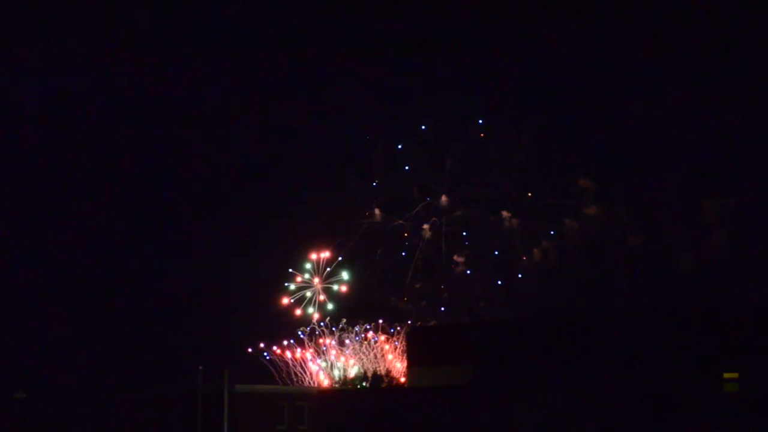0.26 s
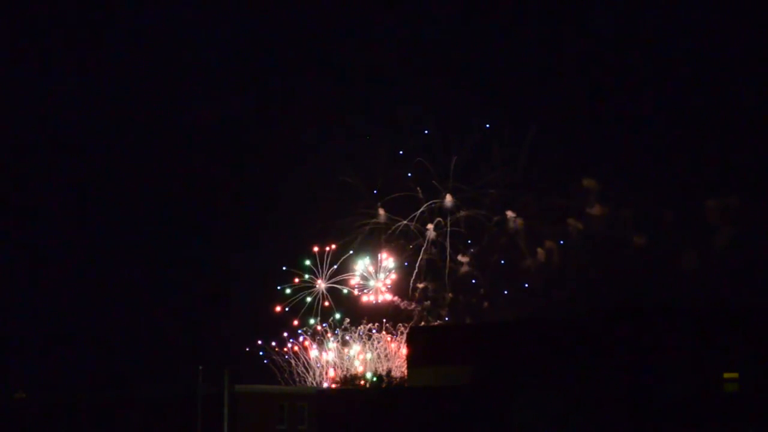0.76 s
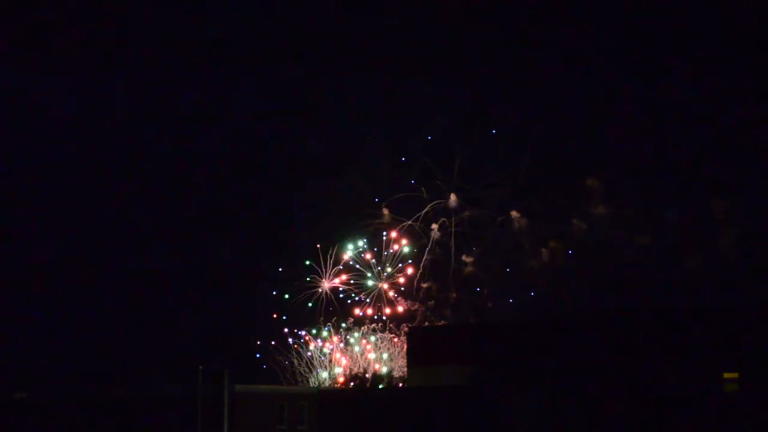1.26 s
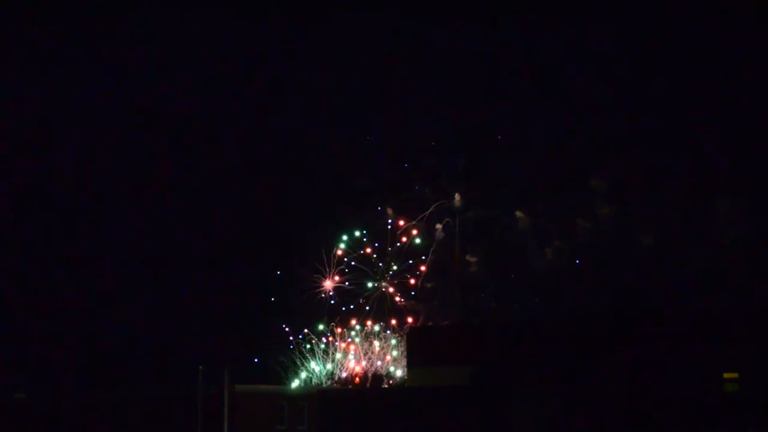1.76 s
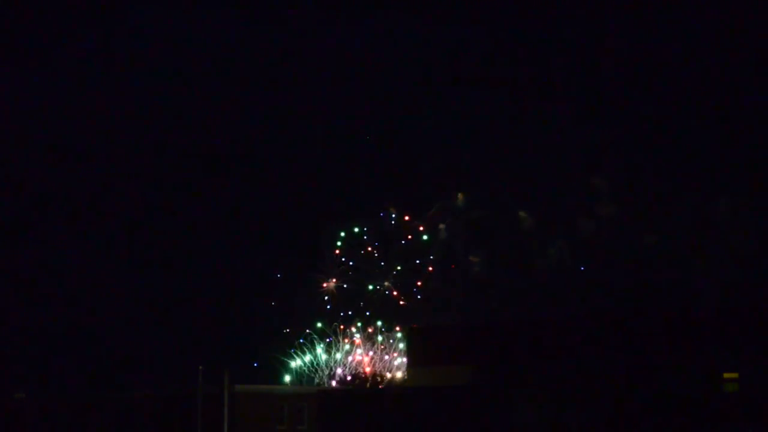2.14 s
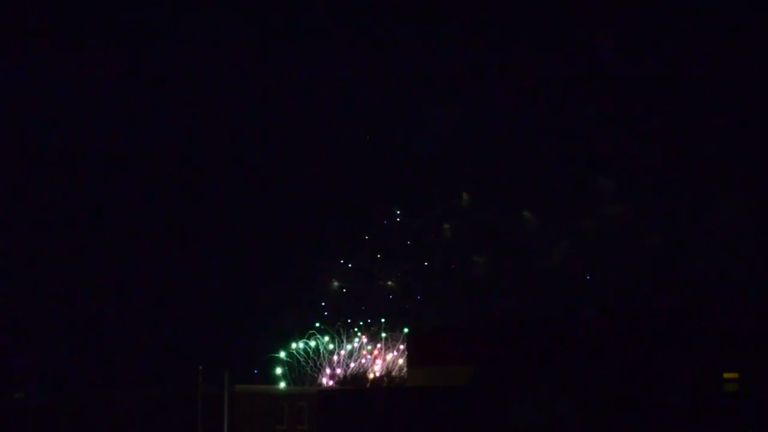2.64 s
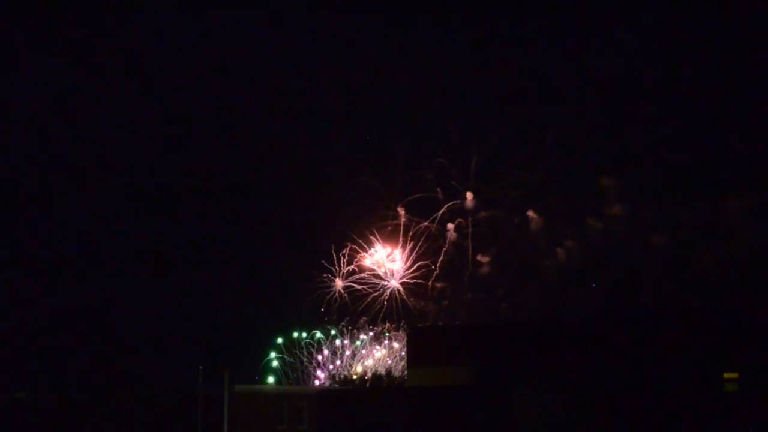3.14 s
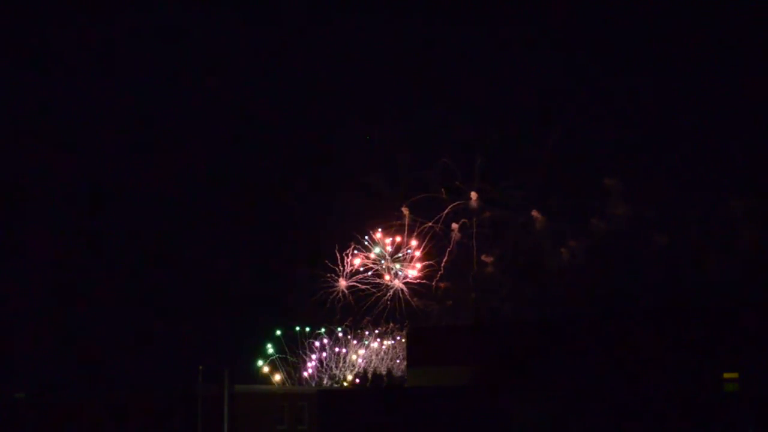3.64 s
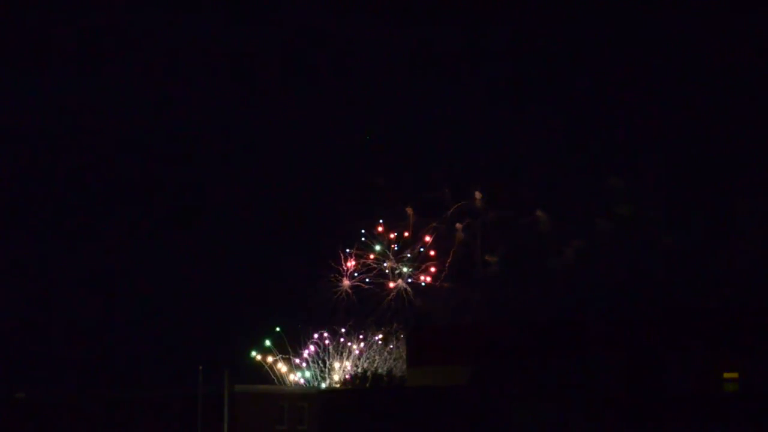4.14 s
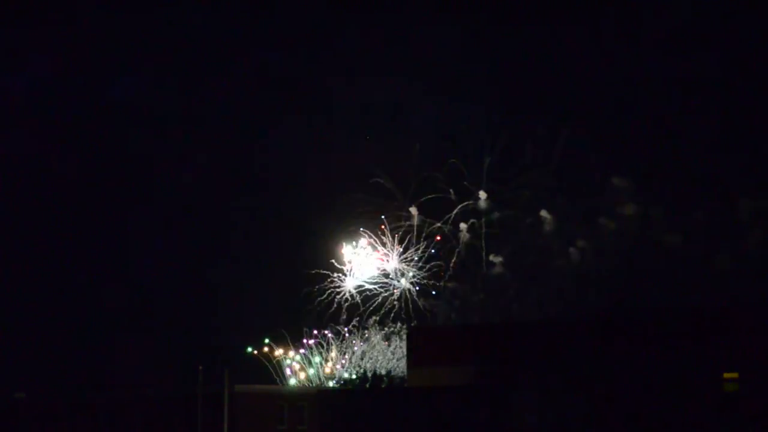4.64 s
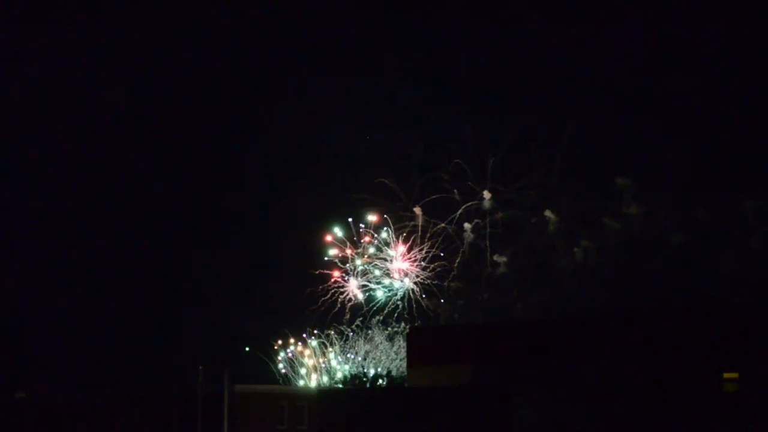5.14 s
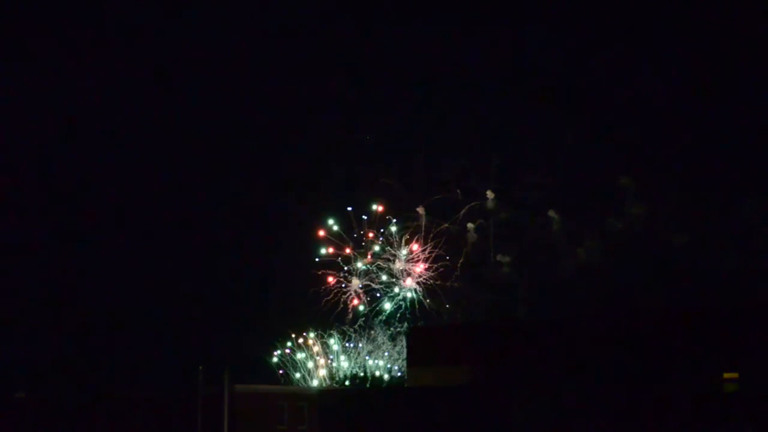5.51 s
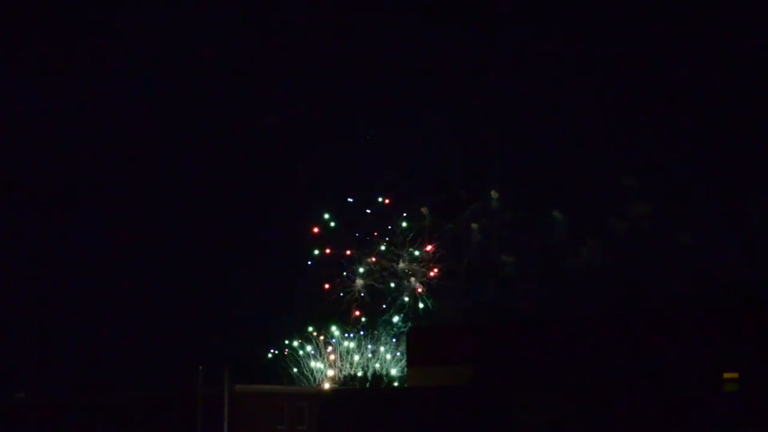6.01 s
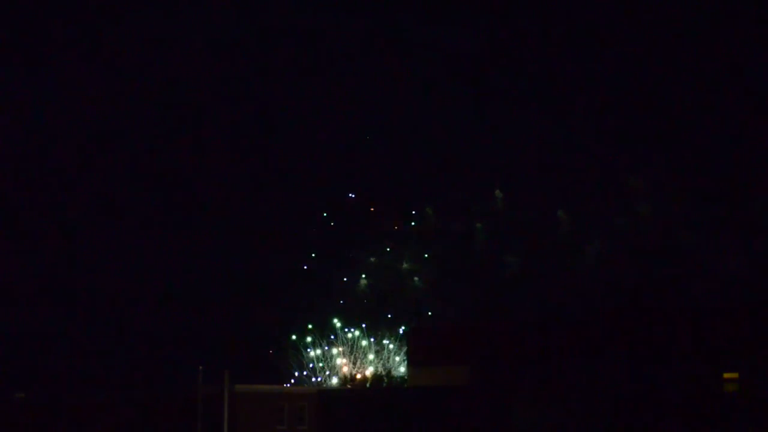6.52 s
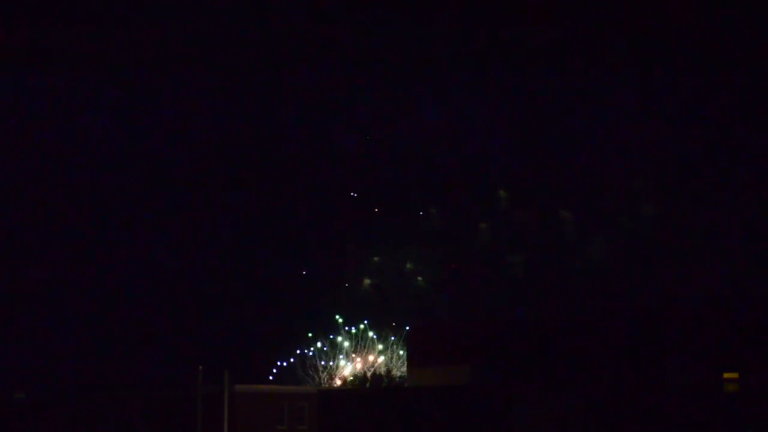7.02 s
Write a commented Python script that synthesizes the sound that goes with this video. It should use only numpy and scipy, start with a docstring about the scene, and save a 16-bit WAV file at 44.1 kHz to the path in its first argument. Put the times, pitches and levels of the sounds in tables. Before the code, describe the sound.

Three fireworks bang some way off at night, each echoing from house fronts and rolling away over the town, the last one weaker.

```python
"""A town at night, microphone between buildings, three firework shells bursting some way off.
Each shock front rings the nearby walls, comes back as separate echoes from farther house fronts
and rolls away over the roofs. Underneath lie the last of an earlier shell's roll, small far shots,
the dull wash of the distant display and the camera's own hiss and faint whine."""
import sys
import numpy as np
from scipy import signal
from scipy.fft import rfft, irfft, next_fast_len
from scipy.io import wavfile

SR = 44100
rng = np.random.default_rng(int(sys.argv[2]) if len(sys.argv) > 2 else 0)


def materialize(psi):
    """Save the field psi as 16-bit PCM at rate SR to the path in sys.argv[1].

    A 1-D psi becomes a single channel; in a 2-D psi each row is a channel.
    """
    bounded = np.clip(np.atleast_2d(psi).T, -1, 1)
    quanta = np.round(bounded * 32767).astype(np.int16)
    wavfile.write(sys.argv[1], SR, quanta)


N = 320607
TIME = np.arange(N) / SR

# shell bursts: t/s, level/dB, sideways offset/m, rumble in the near streets/dB, reach into town/dB,
# overpressure/ms, bass edge/Hz, treble edge/Hz, crack f/Hz, crack/dB, its overtones/dB, boom/dB,
# boom tilt/(dB per octave), near scatter/dB
SHELLS = [(2.003, -0.9, 0, 1, -0.5, 0.97, 66, 2460, 1000, 1.5, 5.5, -13, 4.5, -18),
          (3.7184, -2, 7, -1, 0.66, 1.1, 60, 2600, 1050, -6.5, -3, -7, -7.5, -17),
          (6.4248, -13.5, 0, 2, -7.5, 2.7, 159, 1720, 890, -1, 1, -1, 1, -11)]
# the low and the bright part of a bang heard across town, as spectra: f/Hz, level/dB
RUMBLE = [(25, -28), (55, 3.5), (85, 1), (125, 4.5), (170, -6), (290, -7.5), (400, -16), (700, -24)]
CLATTER = [(250, -46), (450, -3), (700, 0.5), (1000, 1.5), (1400, -3), (1800, -10), (2400, -20),
           (3500, -37)]


def from_db(db):
    """Decibels to gain."""
    return 10 ** (np.asarray(db) / 20)


def rms_one(x):
    """Scale to rms 1."""
    return x / np.sqrt(np.mean(x ** 2) + 1e-20)


def add(out, s, sound):
    """Mix a sound in at time s."""
    at = int(round(s * SR))
    out[at:at + len(sound)] += sound[:len(out) - at]


def cut(x, hz, kind, order=2):
    """Causal Butterworth filter."""
    return signal.sosfilt(signal.butter(order, hz, kind, fs=SR, output="sos"), x)


def ring(x, hz, t60):
    """A resonance: a unit click sets off a dying sine of height 1."""
    r, w = from_db(-60 / (t60 * SR)), 2 * np.pi * hz / SR
    return signal.lfilter([0, np.sin(w)], [1, -2 * r * np.cos(w), r * r], x)


def noise(spectrum, peaks=(), size=N):
    """Noise with a smooth spectrum and resonances standing on it; rms 1."""
    padded = next_fast_len(size)
    hz = np.maximum(np.arange(padded // 2 + 1) * SR / padded, 1)
    points_hz, points_db = np.transpose(spectrum)
    smooth_db = np.interp(np.log(hz), np.log(points_hz), points_db, left=-np.inf, right=-np.inf)
    power = from_db(smooth_db) ** 2
    for centre, width, db in peaks:
        power += (from_db(db) / (1 + ((hz - centre) / width) ** 2 * 2)) ** 2
    white = rfft(rng.standard_normal(padded))
    return rms_one(irfft(white * np.sqrt(power), padded)[:size])


def puff(spectrum, envelope, peaks=()):
    """A puff of noise that carries the energy of its envelope."""
    shaped = noise(spectrum, peaks, size=len(envelope)) * envelope
    return rms_one(shaped) * np.sqrt(np.mean(envelope ** 2))


def flutter(per_s, depth_db):
    """A gain that wanders at random, per_s times a second."""
    knots = rng.standard_normal(int(N / SR * per_s) + 2)
    return from_db(depth_db * np.interp(TIME * per_s, np.arange(len(knots)), knots))


def display_wash(level_db=-59):
    """The distant display blurs into a dull, slightly wavering wash."""
    # spectrum of the wash: f/Hz, level/dB
    spectrum = [(20, -23.5), (40, -6), (65, -3.5), (95, -1), (118, 6.5), (160, -3.5), (300, -4),
                (450, -7.5), (650, -4), (950, -4.5), (1350, -12), (1750, -21), (3000, -35)]
    return from_db(level_db) * flutter(27, depth_db=1.1) * noise(spectrum)


def camera_hiss(hiss_db=-58, whine_db=-84.5, whine_hz=15741, beat_hz=.336):
    """Right at the microphone: the camera's own hiss and its faint, slowly beating whine."""
    # spectrum of the hiss: f/Hz, level/dB
    spectrum = [(1000, -11.5), (2000, -12), (3400, -9.5), (4500, -3), (5000, -3.5), (5850, -23.5),
                (6600, -8.5), (7500, -12.5), (8300, -16.5), (9600, -18), (12000, -23.5), (15500, -25.5)]
    # resonances in the hiss: f/Hz, width/Hz, level/dB
    resonances = [(1506, 60, 11.5), (1870, 130, 4.5), (2118, 100, 16), (2278, 113, 14.5), (2590, 79, 2.5),
                  (2924, 193, 12), (3163, 55, 10.5), (3550, 90, 2), (3959, 141, 15.5), (4336, 55, 11.5),
                  (4710, 190, 4), (5160, 78, 0), (5443, 185, 8.5), (6050, 80, -0.5), (6295, 190, 7),
                  (6780, 110, -0.5), (7200, 230, -5.5), (7740, 180, -6.5)]
    whine = np.sin(2 * np.pi * whine_hz * TIME) * np.sin(np.pi * beat_hz * TIME)
    return from_db(hiss_db) * noise(spectrum, resonances) + from_db(whine_db) * rms_one(whine)


def range_power(town_range, s):
    """Rumble and clatter power from one range of the town: it swells after time s, then fades evenly."""
    delay, rise_s, fade_db_per_s, rumble_db, clatter_db = town_range
    t = np.maximum(TIME - s - delay, 0)
    swell = (1 - np.exp(-(t / rise_s) ** 2)) * from_db(-fade_db_per_s * t)
    return (from_db([[rumble_db], [clatter_db]]) * swell) ** 2


def roll(s, street_db=0, reach_db=0):
    """Countless weak reflections from four ranges merge into a lumpy, fading roll."""
    # reflecting ranges, near to far: delay/s, rise/s, fade/(dB per s), rumble/dB, clatter/dB
    nearest_roofs = (0, 0.16, 202, -51, -31)
    near_streets = (0, 0.01, 22, -41, -43)
    far_blocks = (.42, .1, 26.5, -48.5, -48.5)
    horizon = (0, 0.61, 5.5, -55.5, -50)
    streets = from_db([[street_db], [reach_db]]) ** 2 * range_power(near_streets, s)
    town = sum(range_power(town_range, s) for town_range in (nearest_roofs, far_blocks, horizon))
    rumble_gain, clatter_gain = np.sqrt(streets + from_db(reach_db) ** 2 * town)
    rumble = rumble_gain * flutter(45, depth_db=3.0) * noise(RUMBLE)
    clatter = clatter_gain * flutter(70, depth_db=2.0) * noise(CLATTER)
    return rumble + clatter


def town_rolls(earlier_shell_s=-1.63, bass_edge_ratio=1.07):
    """Every shell sets the town rolling with its own bass; an earlier roll is fading at the start."""
    out = roll(earlier_shell_s)
    for s, _, _, street_db, reach_db, _, bass_hz, *_ in SHELLS:
        out += cut(roll(s, street_db, reach_db), bass_edge_ratio * bass_hz, "high", order=3)
    return out


def smear(spectrum, rise_s, peaks=()):
    """A rough wall smears a bang into a short swell; rms 1 around its top."""
    t = TIME[:SR // 8]
    return puff(spectrum, t / rise_s * np.exp(1 - t / rise_s), peaks)


def far_bang(thud_db, clap_db, knock_hz, knock_db):
    """A bang from far off: a low thud and a brighter clap that knocks at a random pitch near knock_hz."""
    hz = knock_hz * 2 ** rng.uniform(-0.29, 0.23)
    thud = from_db(thud_db) * smear(RUMBLE, rise_s=.005)
    clap = from_db(clap_db) * smear(CLATTER, rise_s=0.0032, peaks=[(hz, 280, knock_db)])
    return thud + clap


def far_shots():
    """Small, distant reports around the big shells."""
    # lone thumps and claps: t/s, thud/dB, clap/dB
    shots = [(.069, -47, -56), (.192, -62, -50), (1.062, -66, -50.5), (4.037, -52, -37.5),
             (4.818, -62, -48), (5.222, -65, -50), (5.253, -71, -50.5), (5.536, -56, -52)]
    out = np.zeros(N)
    for s, thud_db, clap_db in shots:
        add(out, s, far_bang(thud_db, clap_db, knock_hz=840, knock_db=7))
    return out


def crack(click, hz, level_db, overtones_db):
    """The short, bright ringing of the shock front."""
    # modes of the crack: f/(multiple of its pitch), level/dB, t60/s
    modes = [(1, 3, 0.0098), (1.4, -10.5, 0.014), (1.6, -49, 0.027)]
    main, *overtones = [from_db(db + level_db) * ring(click, ratio * hz, t60) for ratio, db, t60 in modes]
    build_up = 1 - np.exp(-TIME[:len(click)] / 4.5e-4)   # the ringing needs half a cycle to grow
    return (main + from_db(overtones_db) * sum(overtones)) * build_up


def wall_boom(click, level_db, tilt_db, pivot_hz=132):
    """The walls around ring: a small, hard charge favours the higher resonances, a big one the lower."""
    # wall resonances: f/Hz, level/dB, t60/s
    modes = [(80, -17.5, 0.14), (132, 0, 0.066), (215, -3.5, 0.028), (312, -13, 0.067), (570, -12.5, 0.029)]
    return sum(from_db(db + level_db + tilt_db * np.log2(hz / pivot_hz)) * ring(click, hz, t60)
               for hz, db, t60 in modes)


def near_scatter(t, rise_s=0.00096, spray_t60=0.089, linger_t60=0.25, linger_db=-11):
    """Sills, railings and roofs close by throw back a quickly thinning spray; its low part lingers."""
    # spectra of the spray and of the duller sound between the houses: f/Hz, level/dB
    spray_spectrum = [(50, -7), (90, 9), (180, -8), (300, 8), (450, -11.5), (650, 2), (1000, 1),
                      (1400, -5.5), (1900, -8.5), (2600, -12.5), (3600, -16), (6000, -38)]
    courtyard_spectrum = [(70, -14), (130, 1.5), (220, -2), (310, -5.5), (450, -5.5), (650, -10),
                          (1000, -16)]
    onset = 1 - np.exp(-(t / rise_s) ** 2)
    spray = puff(spray_spectrum, onset * from_db(-60 * t / spray_t60))
    linger = puff(courtyard_spectrum, onset * from_db(-60 * t / linger_t60))
    return spray + from_db(linger_db) * linger


def through_air(x, treble_hz, rounding_hz=3300):
    """The long path to the microphone swallows the treble and rounds the front."""
    return cut(cut(x, treble_hz, "low", order=3), rounding_hz, "low")


def burst(overpressure_ms, bass_hz, treble_hz, crack_hz, crack_db, overtones_db, boom_db, tilt_db,
          scatter_db, wall_s=0.012, wall_db=-17):
    """One shock front, a jump of pressure then a longer suction, with ringing and scatter close by."""
    t = TIME[:SR // 4]
    age = t / (overpressure_ms / 1000)
    jump = 1 - np.exp(-t / 1.4e-4)
    front = (1 - age) * np.exp(-age) * jump
    click = signal.unit_impulse(len(t))
    report = front + crack(click, crack_hz, crack_db, overtones_db)
    shock = report + wall_boom(click, boom_db, tilt_db)
    add(shock, wall_s, from_db(wall_db) * cut(report, 1400, "low"))   # the nearest wall answers first
    shock += from_db(scatter_db) * near_scatter(t)
    return -through_air(cut(shock, bass_hz, "high"), treble_hz)


def shell_bursts():
    """Each shell's bang as it first reaches the microphone."""
    out = np.zeros(N)
    for s, db, _, _, _, *shape in SHELLS:
        add(out, s, from_db(db) * burst(*shape))
    return out


def house_echoes(sound_m_per_s=343, bass_edge_ratio=.65):
    """The same house fronts return every shell; its place shifts the delays, its bass edge thins them."""
    # house fronts: delay/s, extra path/(m per m of the shell's offset), thud/dB, clap/dB
    house_fronts = [(.107, 0, -38, -52), (.147, -.3, -31.5, -42), (.168, .2, -42, -46),
                    (.276, .3, -42.5, -43.5), (.368, .5, -38.5, -43), (.474, -1.45, -43, -41),
                    (.474, -.25, -41.5, -37.5), (.476, .6, -44, -39), (.547, 0, -43.5, -46.5),
                    (.596, .85, -44.5, -43), (.616, .7, -45, -44), (.666, 0.96, -53, -43.5),
                    (.748, 0.11, -44, -56)]
    out = np.zeros(N)
    for s, _, offset_m, _, reach_db, _, bass_hz, *_ in SHELLS:
        for delay, slant, thud_db, clap_db in house_fronts:
            bang = far_bang(thud_db, clap_db, knock_hz=1150, knock_db=2.5)
            echo = from_db(reach_db) * cut(bang, bass_edge_ratio * bass_hz, "high")
            add(out, s + delay + slant * offset_m / sound_m_per_s, echo)
    return out


def scene():
    """Everything at one microphone between the buildings."""
    return (shell_bursts() + house_echoes() + town_rolls() + far_shots()
            + display_wash() + camera_hiss())[None]


def record(dry, rolloff_hz=36, cutoff_hz=16300):
    """The microphone loses the deepest bass, the loudest front just overloads the input; the top is cut."""
    heard = np.clip(cut(dry, rolloff_hz, "high"), -1, 1)
    return signal.sosfilt(signal.ellip(10, .1, 70, cutoff_hz, fs=SR, output="sos"), heard)


dry = scene()
out = record(dry)
materialize(out)
```